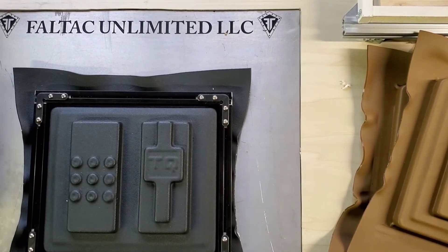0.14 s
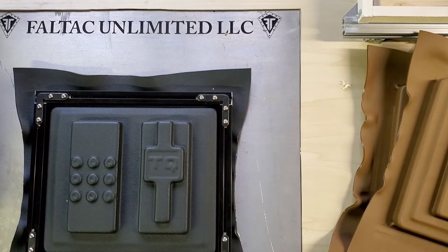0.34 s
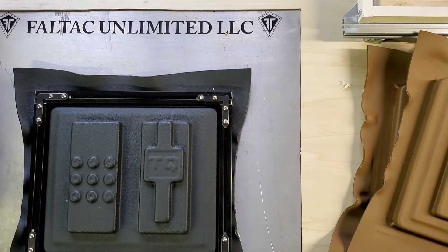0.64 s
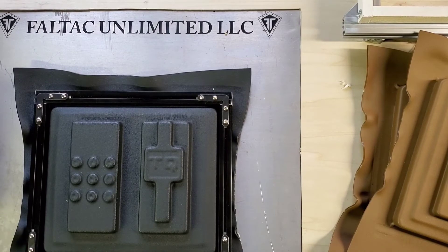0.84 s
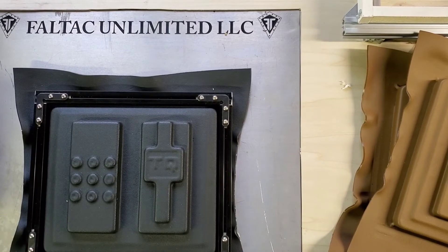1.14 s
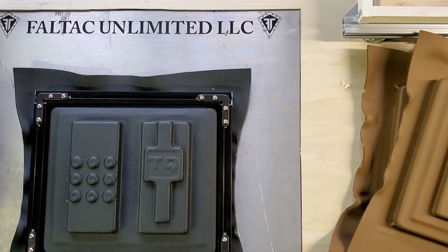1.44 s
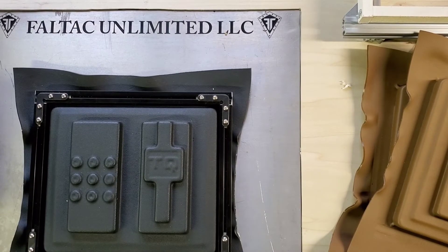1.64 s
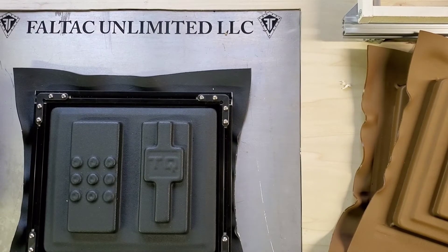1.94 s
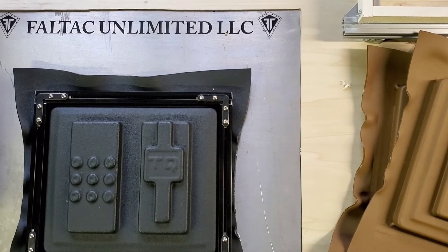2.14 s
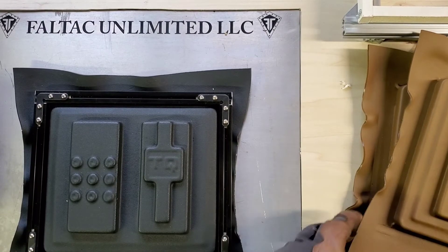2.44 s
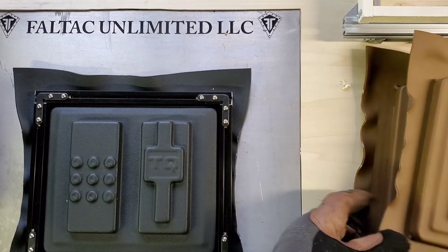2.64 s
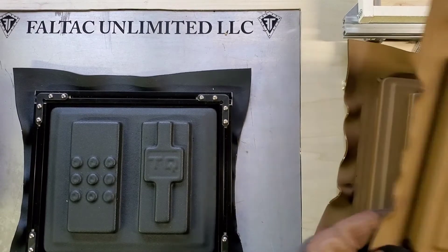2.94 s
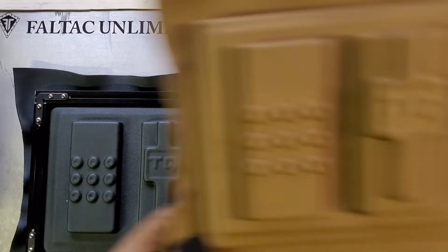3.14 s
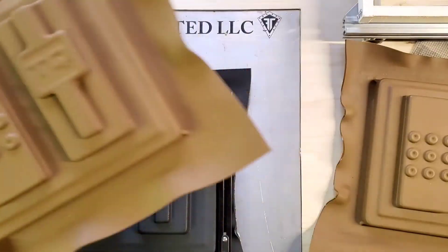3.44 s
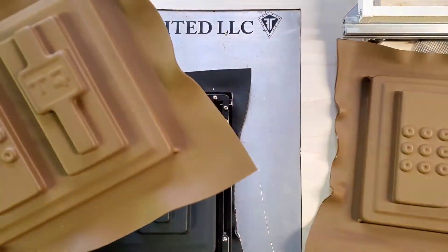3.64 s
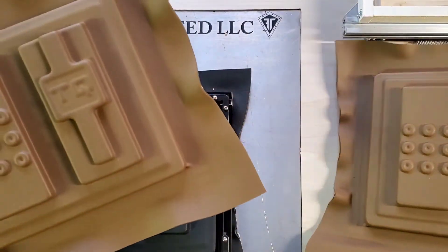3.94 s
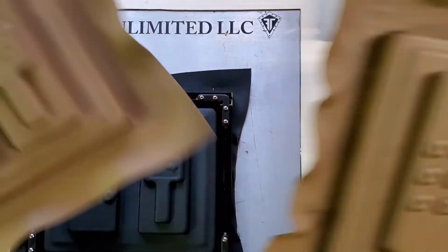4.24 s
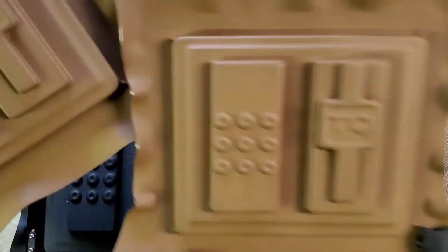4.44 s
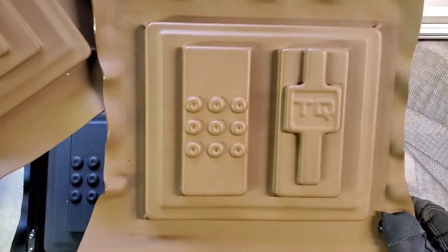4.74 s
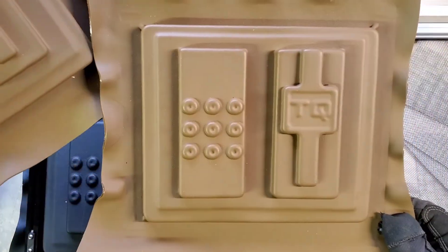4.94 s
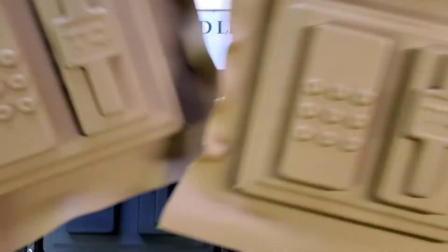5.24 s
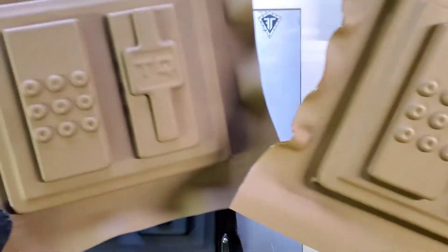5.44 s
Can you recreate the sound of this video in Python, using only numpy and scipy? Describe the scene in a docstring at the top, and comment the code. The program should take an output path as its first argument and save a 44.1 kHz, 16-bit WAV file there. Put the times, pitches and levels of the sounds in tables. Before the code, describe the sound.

Small quiet workshop, close stereo microphone. Soft air noise and a barely audible machine hum. A small click near the start, then faint sleeve rustles and crinkles. A thin plastic sheet is dragged off a pile with a grainy, juddering, hollow scrape and knocks. After a pause come dull clacks, then a loud snap with deep flexing wobble and rattle, and a last lighter knock.

```python
"""Thin plastic sheets on a bench

Vacuum-formed sheets knock, snap, wobble and rattle in a small room, over air noise and a faint machine hum.
A sleeve rustles and crinkles; one sheet is dragged off the pile with a rough, ticking scrape.
Blows and wobbles are decaying modes; scrape, rubs and cloth are filtered grainy noise under moving gains.
"""
import sys
import numpy as np
from scipy import signal
from scipy.fft import rfft, irfft, next_fast_len
from scipy.io import wavfile
from scipy.ndimage import uniform_filter1d, map_coordinates

SR = 44100
rng = np.random.default_rng(int(sys.argv[2]) if len(sys.argv) > 2 else 0)


def to_wav(s):
    """Save 16-bit WAV."""
    ch = np.atleast_2d(s).T  # columns
    pcm = np.round(np.clip(ch, -1, 1) * 32767)  # PCM
    wavfile.write(sys.argv[1], SR, pcm.astype(np.int16))


N = 246069
T = np.arange(N) / SR
HZ = np.maximum(np.fft.rfftfreq(next_fast_len(N), 1 / SR), 1)

# Room air spectrum: (frequency [Hz], relative level [dB])
AIR_SPECTRUM = [(25, -7.5), (50, 2), (110, -5.5), (200, -14.5), (400, -14.5), (800, -21), (2000, -21.5),
                (5000, -29.5), (9000, -38), (16000, -33.5)]
# Machine hum: (frequency [Hz], level [dB], depth of slow swell [0-1])
HUM_TONES = [(358, -75, .2), (600, -82, .3)]
# Cloth spectrum: (frequency [Hz], relative level [dB])
CLOTH_SPECTRUM = [(450, 2.5), (1000, 6), (1900, 10), (2700, 9.5), (4000, -1), (6500, -11), (9000, -18),
                  (12000, -12), (16000, -18)]
# Sleeve and hand brushing past: (time of fastest motion [s], half length [s], level [dB], relative hiss [dB])
SLEEVE_STROKES = [(0.048, 0.03, -54, -9), (0.38, 0.11, -67, -7.5), (0.746, 0.095, -63.5, -10.5),
                  (0.991, 0.035, -56, 1), (1.024, 0.017, -59, -1), (1.424, 0.032, -55.5, -12.5),
                  (1.58, 0.04, -59.5, -11), (1.869, 0.051, -56, -8), (2.22, 0.051, -59.5, -5.5),
                  (2.365, 0.018, -57, -2), (2.475, 0.032, -56.5, -1), (2.833, 0.018, -49, 4),
                  (3.021, 0.0024, -51, 11.5), (3.524, 0.009, -47, -9.5), (3.726, 0.03, -56, 0),
                  (4.207, 0.035, -58.5, -4)]
# Small cloth crinkles: (time [s], level [dB], relative treble [dB])
CLOTH_CRINKLES = [(0.263, -54.5, -7), (0.39, -52.5, -7.5), (0.641, -57, 1), (0.802, -54, -5),
                  (.909, -48, -4), (1.029, -54.5, -3), (1.104, -60, -13), (1.14, -57.5, -9),
                  (1.355, -60.5, -6), (1.784, -53, -12), (2.181, -54.5, -7.5), (2.252, -56.5, -13),
                  (2.348, -51.5, -13)]
# Sliding plastic spectrum: (frequency [Hz], relative level [dB])
SLIDE_SPECTRUM = [(50, -4.5), (90, -4), (170, -6), (280, -7.5), (450, -2.5), (620, -4.5), (900, -15.5),
                  (1500, -16.5), (2000, -13.5), (3200, -23.5), (5000, -24.5), (8700, -38.5), (11800, -32.5),
                  (16000, -39)]
# Resonances of the moulded hollows: (frequency [Hz], width [Hz], lift [dB])
HOLLOW_RESONANCES = [(480, 120, 6), (624, 63, 5), (1020, 120, 4.5), (1880, 190, 4), (3000, 310, 6.5)]
# One pull off the pile, easing off: (time [s], scrape force [dB], main hollow under the sheet [Hz])
DRAG_PATH = [(2.443, -54, 451.6), (2.66, -45.5, 447.7), (2.9, -42, 440), (2.95, -37.5, 448.8),
             (3.04, -30.5, 470.6), (3.09, -25, 502), (3.169, -29, 529), (3.262, -35, 500),
             (3.36, -39.5, 538.6), (3.48, -48, 508.4), (3.75, -47.5, 480), (4.13, -60, 480)]
# Short rubs: (time of middle [s], half length [s], level [dB], relative rasp [dB], spot resonance [Hz])
RUB_EVENTS = [(0.923,0.029,-61,9,1020), (2.566,0.04,-37.5,-11,750), (2.705,0.02,-34.5,-8.5,547),
              (2.826,0.034,-33,-7,643), (2.971,.026,-34,-9,440), (3.069,.015,-25.5,3.5,542),
              (3.158,0.017,-33,-6,900), (3.382,0.045,-42.5,-7.5,570), (3.624,.015,-45,-11,790),
              (4.621,0.0135,-51.5,-9,550), (4.7,0.019,-53,-8,1600), (5.018,0.0089,-58,-2,1810),
              (5.06,0.027,-56,-4.5,432), (5.095,0.02,-41.5,-19,427)]
# Wobbles of a whole sheet or one stiff panel: (time [s], frequency [Hz], level [dB])
WOBBLE_EVENTS = [(0, 42, -50), (0.549, 380.5, -21.5), (0.718, 104, -36.5), (1.40, 67, -50.5),
                 (2.794, 84.6, -30.5), (3.626, 84.5, -30.5), (3.893, 78.1, -37), (4.019, 129, -34.5),
                 (4.293, 70, -23), (4.306, 48.4, -18), (4.542, 38.8, -29), (4.663, 49.9, -32),
                 (4.801, 51.2, -44), (5.172, 138.7, -31.5), (5.173, 195.3, -28)]
# Blows on the sheets: (time [s], strength [dB], relative low thud [dB], contact [ms], build-up [ms],
# left minus right [dB], ring length as the grip damps it [x usual], struck spot resonance [Hz])
BLOWS = [(.547,-42.5,-34,0.049,1.7,1.5,1.08,4114), (.555,-48.5,-35,1.3,6.7,-1,1.7,1955),
         (.704,-57,11,0.5,1.1,1,0.81,447), (.908,-56,-1.5,0.34,0.46,9,0.58,826),
         (1.411,-64.5,10,0.34,1.4,1,0.98,416), (2.505,-38.5,-7,0.9,2.2,-2,0.74,358),
         (2.554,-35,-11.5,1.26,3.7,-16,1.25,793), (2.683,-35,-1.5,1.2,1.3,-5,0.54,363),
         (2.697,-36,-23,0.48,1.2,1,0.68,900), (2.793,-33,2,0.57,0.52,-1.5,0.98,636),
         (2.872,-25.5,-4,1.6,1.2,-3,0.87,536.1), (3.063,-22,-10.5,1.194,2.3,1,0.34,389),
         (3.108,-26,-4,0.76,0.77,1,0.48,620), (3.596,-31,-4,2.5,2.5,-12,0.83,480),
         (3.618,-23.5,-7.5,2.04,1.74,-4,0.53,432), (3.634,-38,-2,2.1,1.38,-5,0.742,630),
         (3.887,-42.5,3,0.91,0.9,-2,0.7,1190), (4.013,-45.5,6.5,.15,1.1,0,0.8,2450),
         (4.277,-20,-4.5,0.24,1.2,0.5,0.86,2030), (4.33,-30,-7.5,0.27,1.4,3.5,1.22,720),
         (4.396,-37.5,-18,0.41,1.7,3,1.2,700), (4.476,-26.5,-4,0.24,0.43,-0.5,0.48,2680),
         (4.537,-39.5,-6,0.32,0.79,5.5,0.74,545), (4.652,-47,-2,0.19,2.7,2,0.63,550),
         (4.793,-40,-28,0.059,2.2,3,1.12,2040), (5.171,-34.5,-8.5,0.41,0.75,1,0.49,637)]
# Clear modes of a formed sheet: (frequency [Hz], relative level [dB], usual t60 [s])
SHEET_MODES = [(104.6, -5.5, 0.23), (140.3, -5, 0.23), (196.7, -3, 0.31), (240.6, -1, 0.062),
               (304, -4, 0.22), (395, -7, 0.071), (472.5, -1.5, 0.12), (521.7, 6, 0.09), (693, -5, 0.066),
               (792, -7.5, 0.07), (1255, 8, 0.062), (1490, 1.5, 0.04), (1872, 6.5, 0.1), (2040, 2, 0.12),
               (2620, -2, 0.12), (3340, -6, 0.2), (3840, -2.5, 0.034), (4730, -4.5, 0.073),
               (6100, -4, 0.081)]
# Thud, body, clack, crack, tick: (low [Hz], high [Hz], crowded modes' usual t60 [s], their level [dB], gain [dB])
BLOW_RANGES = [(100.7, 400, 0.42, -2.5, -3), (326, 1100, 0.13, 0.5, -2.5), (1130, 3660, 0.078, 4.5, -1.5),
               (3930, 9300, 0.06, 11.5, -1.5), (8100, 21000, 0.083, 0, 3)]
# Spectrum of the crowded modes: (frequency [Hz], relative level [dB])
CRACK_SPECTRUM = [(70, 12.5), (550, 2.5), (1100, -10.5), (2100, -8.5), (4000, -22.5), (6000, -27),
                  (9000, -35.5), (12000, -35.5), (16000, -40.5)]
# Likeness of the two channels: (frequency [Hz], correlation [-1 to 1])
CHANNEL_CORRELATION = [(40, 1), (125, 0.94), (300, 0.86), (550, 0.23), (1000, 0.01), (16000, 0.056)]
# Colour difference of the microphone ports: (frequency [Hz], left minus right [dB])
PORT_DIFFERENCE = [(250, 1.06), (500, 0.5), (1100, -0.5), (2000, 1.5), (4000, 1.5), (8000, 2),
                   (14000, -6.5)]


def undb(db):
    """Decibels to gain."""
    return 10 ** (np.asarray(db) / 20)


def unit(x, size=None):
    """Scale to rms 1, judged on the first size samples."""
    return x / np.sqrt(np.mean(x[..., :size] ** 2) + 1e-24)


def along(points):
    """Interpolate a (frequency [Hz], value) table over log frequency."""
    hz, value = np.transpose(points)
    return np.interp(np.log(HZ), np.log(hz), value)


def band(lo_hz, hi_hz, order=6):
    """Gain of a steep band-pass."""
    low_side = 1 + (lo_hz / HZ) ** (2 * order)
    high_side = 1 + (HZ / hi_hz) ** (2 * order)
    return (low_side * high_side) ** -.5


def resonance(hz, width_hz):
    """Gain of a single resonance."""
    return 1 / (1 + (2 * (HZ - hz) / width_hz) ** 2)


def hollow_shell():
    """Gain of sliding plastic with the resonances of its moulded hollows."""
    lift_db = sum(db * resonance(hz, width_hz) for hz, width_hz, db in HOLLOW_RESONANCES)
    return undb(along(SLIDE_SPECTRUM) + lift_db)


def pan(db):
    """Left and right gains for a level difference."""
    return undb(np.array([[.5], [-.5]]) * db)


def fall(t, t60_s):
    """Free decay by 60 dB in t60."""
    return np.exp(-np.log(1000) * t / t60_s)


def walk(rate_hz):
    """Slow random curve, rms 1 about zero."""
    size = int(SR / rate_hz)
    steps = np.repeat(rng.standard_normal(N // size + 1), size)
    return unit(uniform_filter1d(steps, size)[:N])


def swell(s, db, fade_s=0.0091):
    """Gain that follows a level curve and dies away outside it."""
    outside_s = np.maximum(s[0] - T, 0) + np.maximum(T - s[-1], 0)
    return undb(np.interp(T, s, db)) * np.exp(-outside_s / fade_s)


def texture(gain, grain_db=0):
    """Stereo stream of tiny slips of uneven size through a frequency response."""
    grains = rng.exponential(size=N // 16 + 1)
    sizes = undb(grain_db * np.repeat(grains, 16)[:N].clip(0, 6))
    mid, side = rfft(rng.standard_normal((2, N)) * sizes, next_fast_len(N))
    alike = along(CHANNEL_CORRELATION)
    mid, side = mid * np.sqrt(1 + alike), side * np.sqrt(1 - alike)
    stereo = np.array([mid + side, mid - side])
    return unit(irfft(stereo * gain, next_fast_len(N))[:, :N])


def cut(x, s, t):
    """Stretch of x from time s, at most as long as t."""
    return x[:, int(s * SR):][:, :len(t)]


def add(out, s, x):
    """Mix x in at time s."""
    i = int(s * SR)
    out[:, i:i + x.shape[1]] += x[:, :N - i]


def bend(x, ratio):
    """Shift all resonances of a texture by a moving ratio, as a sheet flexes."""
    place = np.cumsum(ratio)
    return np.array([map_coordinates(side, [place], order=3, mode="mirror") for side in x])


def catches(rate_hz, depth, t60_s=0.025):
    """Stick-slip gain: the surface catches at uneven moments, lets go with a quick jolt and settles."""
    jolts = (rng.random(N) < rate_hz / SR) * rng.exponential(size=N)
    t = T[:SR // 8]
    shape = fall(t, t60_s) - fall(t, t60_s / 10)
    return unit(1 + depth * signal.fftconvolve(jolts, shape)[:N])


def workshop(air_db=-65, stir_db=0.68, stir_hz=3.5, swell_hz=0.22):
    """Room air as noise of slowly stirring level, and a machine's slowly swelling hum tones."""
    air = texture(undb(along(AIR_SPECTRUM)) * band(22, 17000)) * undb(air_db + stir_db * walk(stir_hz))
    slow = np.cos(2 * np.pi * swell_hz * T)
    hum = 0
    for hz, db, depth in HUM_TONES:
        hum = hum + np.sqrt(2) * undb(db) * (1 + depth * slow) * np.sin(2 * np.pi * hz * T)
    return air + hum


def sleeve(hiss_db=-.5, flutter_db=2.5, flutter_hz=60, patchy_db=2, patchy_hz=44.9):
    """Fibres brush as each movement speeds up and slows; each size of fold flutters on its own."""
    swish, hiss = 0, 0
    for s, half_s, db, bright_db in SLEEVE_STROKES:
        stroke = undb(db) / np.cosh(np.minimum(np.abs(T - s) / half_s, 20))
        # overlapping strokes add in power
        swish = np.hypot(swish, stroke)
        hiss = np.hypot(hiss, undb(bright_db) * stroke)
    cloth = undb(along(CLOTH_SPECTRUM))
    edges_hz = np.geomspace(450, 5500, 7)
    folds = 0
    for lo_hz, hi_hz in zip(edges_hz, edges_hz[1:]):
        gain = cloth * band(lo_hz, hi_hz)
        # the norm restores the level that texture() evens out
        folds = folds + texture(gain, grain_db=3.5) * np.linalg.norm(gain) * undb(patchy_db * walk(patchy_hz))
    fibres = texture(cloth * band(5180, 15000), grain_db=1.0)
    brush = unit(folds) * swish + undb(hiss_db) * fibres * hiss
    return brush * undb(flutter_db * walk(flutter_hz))


def crinkles(t60_s=0.28, high_db=-1, snap=0.27, snap_t60_s=0.0046):
    """Folds of cloth give way with a tiny snap and settle in a short crisp burst."""
    cloth = undb(along(CLOTH_SPECTRUM))
    low = texture(cloth * band(1760, 5000), grain_db=2.0)
    high = texture(cloth * band(4100, 9700), grain_db=3.0)
    out, t = np.zeros((2, N)), T[:SR // 3]
    burst = fall(t, t60_s) + snap * fall(t, snap_t60_s)
    for s, db, treble_db in CLOTH_CRINKLES:
        fibres = low + undb(high_db + treble_db) * high
        add(out, s, undb(db) * burst * cut(fibres, s, t))
    return out


def rubs(hiss_db=-12, judder=0.61, judder_hz=100, spot_db=-2.5, spot_q=5, glide=.08):
    """Brief juddering rubs, each singing in its own spot; the pitch sinks as the hand slides on."""
    shell = undb(along(SLIDE_SPECTRUM))
    light = texture(shell * band(210, 1500))  # too light to move the slow modes
    rasp = texture(shell * band(1000, 4200), grain_db=2)
    hiss = texture(shell * band(6700, 21000), grain_db=3.0)
    edge = rasp + undb(hiss_db) * hiss
    out, t = np.zeros((2, N)), T[:SR // 2] - T[:SR // 2].mean()
    for at, half_s, db, rasp_db, hz in RUB_EVENTS:
        spot = texture(resonance(hz, hz / spot_q), grain_db=1)
        friction = cut(light + undb(rasp_db) * edge + undb(spot_db) * spot, at, t)
        stroke = undb(db) * np.exp(-(t / half_s) ** 2)
        add(out, at + t[0], stroke * bend(friction, 1 - glide * np.tanh(t / half_s)))
    return out * catches(judder_hz, judder)


def crackle(count=220, db=-3.0, spread_db=10, lo_hz=480, hi_hz=5000, cycles=20, tilt_db_per_octave=-5.0):
    """The dragged sheet flexes and catches in tiny decaying ticks, each at its own pitch."""
    s, force_db, _ = np.transpose(DRAG_PATH)
    out, t = np.zeros((2, N)), T[:SR // 20]
    for when, pitch, size, side in rng.random((count, 4)):
        at = s[0] + when * (s[-1] - s[0])
        hz = lo_hz * (hi_hz / lo_hz) ** pitch
        tilt_db = tilt_db_per_octave * np.log2(hz / lo_hz)
        gain = undb(db + np.interp(at, s, force_db) + spread_db * size ** 2 + tilt_db)
        tick = np.sin(2 * np.pi * hz * t) * fall(t, cycles / hz)
        add(out, at, gain * tick * pan(10 * (side - .5)))
    return out


def scrape(rasp_db=-6.5, hiss_db=-12, rasp_growth=1.0, hiss_growth=1.153, judder=0.53, judder_hz=80,
           lurch_db=-0.13, lurch_hz=19.0, flex=.06, flex_hz=12, body_pan_db=-2):
    """Grained plastic sticks and slips over the pile; hollows shift as it lifts, rasp and hiss follow force."""
    s, force_db, hollow_hz = np.transpose(DRAG_PATH)
    shell = hollow_shell()
    lift = np.interp(T, s, hollow_hz) / HOLLOW_RESONANCES[0][0]
    low = bend(texture(shell * band(47, 1150), grain_db=1.5), lift) * pan(body_pan_db)
    middle = bend(texture(shell * band(1150, 4200), grain_db=1.5), lift * (1 + flex * walk(flex_hz)))
    high = texture(shell * band(5900, 21000), grain_db=3.0)
    force = swell(s, force_db - force_db.max())
    rasp = undb(rasp_db) * middle * force ** rasp_growth
    hiss = undb(hiss_db) * high * force ** hiss_growth
    slide = undb(force_db.max()) * (low * force + rasp + hiss)
    return slide * catches(judder_hz, judder) * undb(lurch_db * walk(lurch_hz))


def wobbles(rise_s=0.021, cycles_to_60db=23.9):
    """A loose sheet or panel swings in one bending mode; slower swings last longer."""
    out, t = np.zeros((2, N)), T[:SR]
    for s, hz, db in WOBBLE_EVENTS:
        envelope = np.minimum(t / rise_s, 1) * fall(t, cycles_to_60db / hz)
        add(out, s, (undb(db) * np.sin(2 * np.pi * hz * t) * envelope)[None])
    return out


def rattle(swing, db=-21, growth=0.72, edge_db=-3.5, depth=3.9, catch_hz=60):
    """A wobbling sheet's loose edge chatters on its neighbour, hardest at one end of each swing."""
    shell = hollow_shell()
    buzz = texture(shell * band(350, 1100), grain_db=2)
    edge = texture(shell * band(1100, 2600), grain_db=1)
    reach = np.abs(signal.hilbert(swing))
    touch = (reach + np.maximum(swing, 0)) / 2 / reach.max()
    chatter = touch ** growth * (buzz + undb(edge_db) * edge)
    return undb(db) * reach.max() * chatter * catches(catch_hz, depth)


def clear_modes(lo_hz, hi_hz, luck, length, ears, t, detune=.03):
    """The sheet's clear modes in one range; bending in the hands shifts them from blow to blow."""
    clear = np.zeros_like(ears)
    for (hz, db, t60_s), u in zip(SHEET_MODES, luck):
        if lo_hz <= hz < hi_hz:
            swing = np.sin(2 * np.pi * hz * (1 + detune * u) * ears)
            clear += undb(db) * np.sign(u) * swing * fall(t, t60_s * length)
    return clear


def struck_spot(hz, cluster, length, push, t, t60_s=.05, spread=0.11):
    """Modes crowd around the struck spot's resonance, within the spread as a share of it."""
    spot = sum(np.sin(2 * np.pi * (hz * (1 + spread * (2 * u - 1)) * t + turn)) for u, turn in cluster)
    return unit(spot * fall(t, t60_s * length) * push, size=1100)


def knocks(delay_s=.0005, port_lag_s=0.00028, snap=0.4, snap_t60_s=0.0048, softness=2.16, spot_db=-5.5):
    """Blows ring the struck spot, clear modes and a crowd of short ones; long contact spares the high ranges."""
    out, t = np.zeros((2, N)), T[:SR // 3]
    ears = t - np.array([[0], [port_lag_s]])
    chance = rng.standard_normal((len(BLOWS), len(SHEET_MODES)))
    spots = rng.random((len(BLOWS), len(BLOW_RANGES), 2))
    for k, (lo_hz, hi_hz, crowd_t60_s, crowd_db, gain_db) in enumerate(BLOW_RANGES):
        crowd = texture(undb(along(CRACK_SPECTRUM)) * band(lo_hz, hi_hz))
        for blow, luck, cluster in zip(BLOWS, chance, spots):
            s, blow_db, thud_db, contact_ms, build_ms, pan_db, length, spot_hz = blow
            clear = clear_modes(lo_hz, hi_hz, luck, length, ears, t)
            # the contact itself snaps for a few milliseconds before the shell rings on
            dense = cut(crowd, s, t) * (fall(t, crowd_t60_s * length) + snap * fall(t, snap_t60_s))
            push = 1 - np.exp(-(t * 1000 / build_ms) ** 2)
            ring = unit((unit(clear) + undb(crowd_db) * unit(dense)) * push, size=1100)
            # modes that swing more than once during the contact are hardly driven
            swings = np.sqrt(lo_hz * hi_hz) * contact_ms / 1000
            level_db = blow_db + gain_db + (thud_db if k == 0 else 0)
            drive = undb(level_db) / np.hypot(1, swings ** softness)
            # long waves reach both ports equally
            add(out, s + delay_s, ring * drive * pan(pan_db * min(k / 2, 1)))
            if k == 0:
                spot = struck_spot(spot_hz, cluster, length, push, t)
                add(out, s + delay_s, undb(blow_db + spot_db) * spot * pan(pan_db))
    return out


def glance(x, share=0.63, lag_s=.002, sway_s=0.0006, sway_hz=2):
    """Swaying sheets throw back the treble a moment later, combing it differently at each port."""
    treble = signal.sosfilt(signal.butter(2, 900, "high", fs=SR, output="sos"), x)
    echo = np.array([map_coordinates(side, [(T - lag_s - sway_s * walk(sway_hz)) * SR], order=2)
                     for side in treble])
    return (x + share * echo) / np.sqrt(1 + share ** 2 / 2)


def room(x, build_s=0.0029):
    """Bench and walls return a short diffuse tail, as decaying noise in three bands."""
    t, tail = T[:SR * 2 // 3], 0
    # (low [Hz], high [Hz], level [dB], t60 [s])
    bands = [(120, 760, -13, 0.28), (900, 4000, -15, 0.34), (5160, 20000, -14, 0.31)]
    for lo_hz, hi_hz, db, t60_s in bands:
        echo = texture(band(lo_hz, hi_hz))[:, :len(t)] * fall(t, t60_s) * (1 - np.exp(-(t / build_s) ** 2))
        # scaled so that db is the tail's gain within its band
        tail = tail + undb(db) * unit(echo) * np.sqrt(2 * (hi_hz - lo_hz) / SR / len(t))
    return x + signal.fftconvolve(x, tail, axes=1)[:, :N]


def scene():
    """Handling in the room; the wobbles and background are added without its tail."""
    swing = wobbles()
    cloth = sleeve() + crinkles()
    sliding = scrape() + crackle() + rubs()
    handling = cloth + sliding + rattle(swing[0]) + knocks()
    return workshop() + swing + room(glance(handling))


def record(dry, top_hz=16100):
    """The two ports colour the sound a little differently, and the recorder cuts the top."""
    size = next_fast_len(N)
    heard = irfft(rfft(dry, size) * pan(along(PORT_DIFFERENCE)), size)[:, :N]
    return signal.sosfilt(signal.ellip(10, .2, 80, top_hz, fs=SR, output="sos"), heard)


dry = scene()
out = record(dry)
to_wav(out)
```